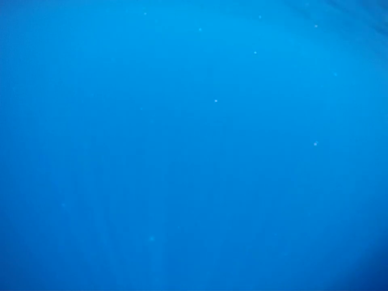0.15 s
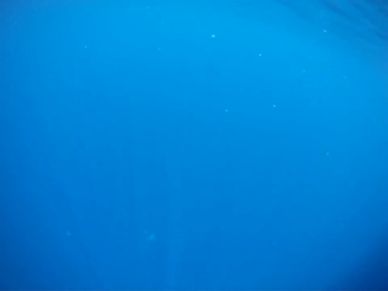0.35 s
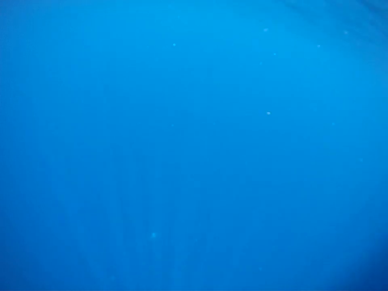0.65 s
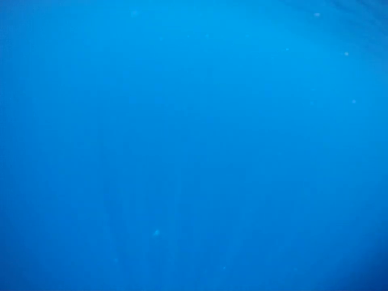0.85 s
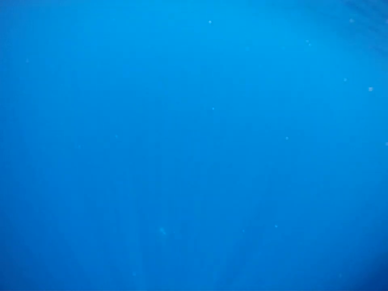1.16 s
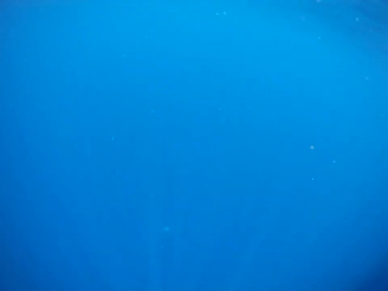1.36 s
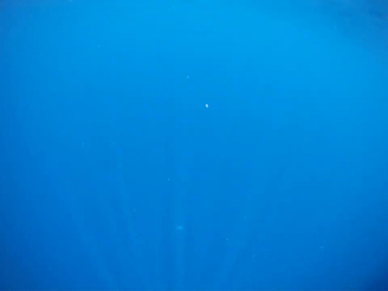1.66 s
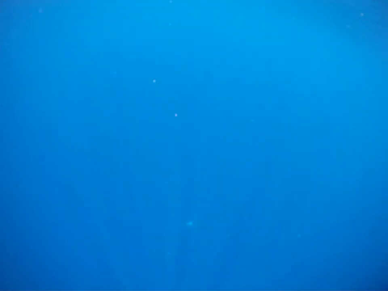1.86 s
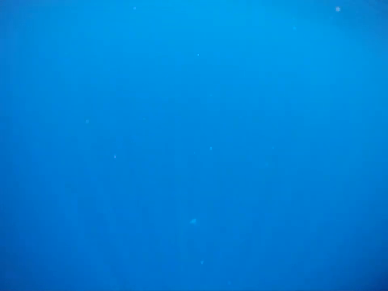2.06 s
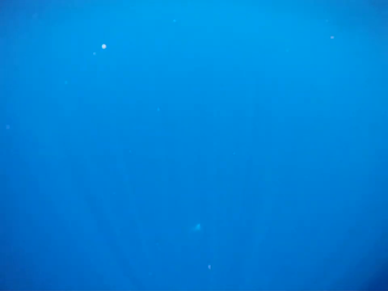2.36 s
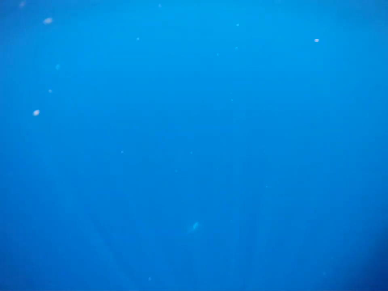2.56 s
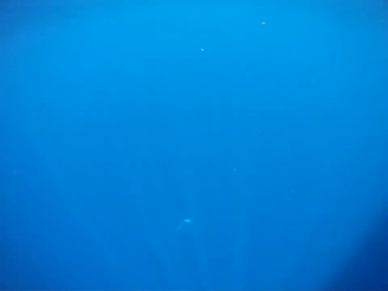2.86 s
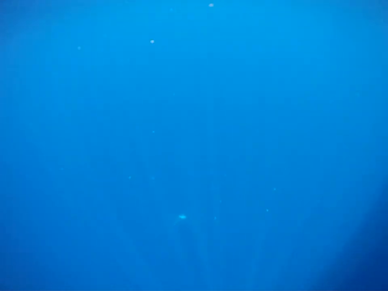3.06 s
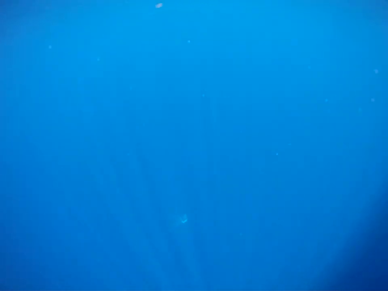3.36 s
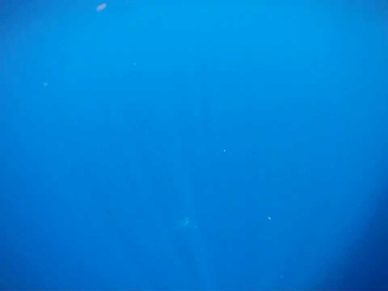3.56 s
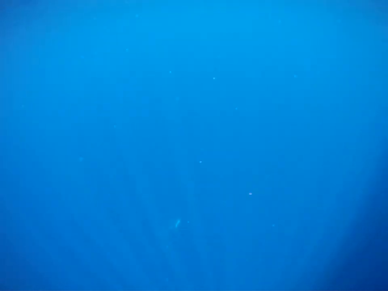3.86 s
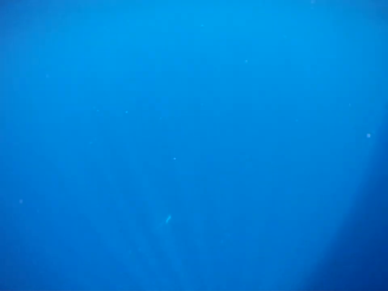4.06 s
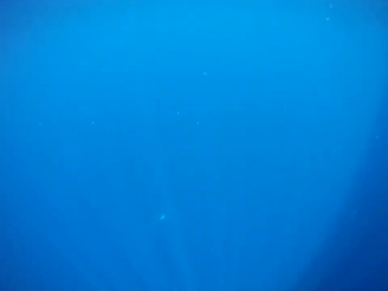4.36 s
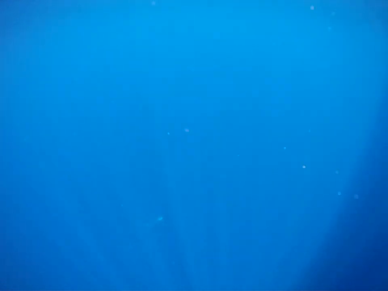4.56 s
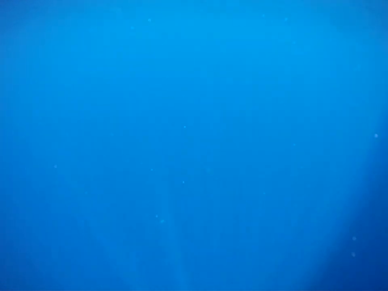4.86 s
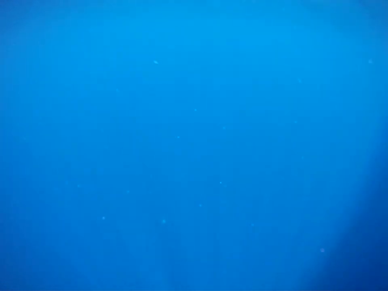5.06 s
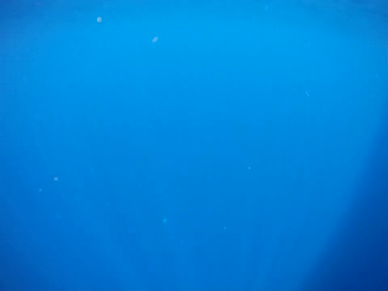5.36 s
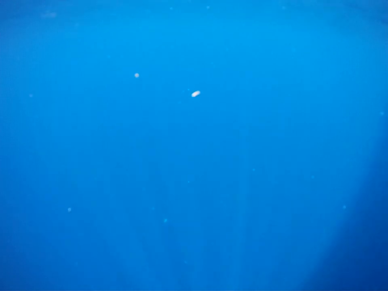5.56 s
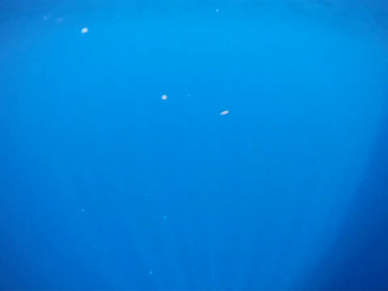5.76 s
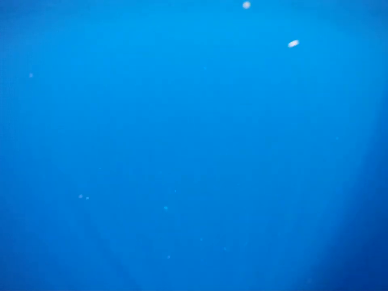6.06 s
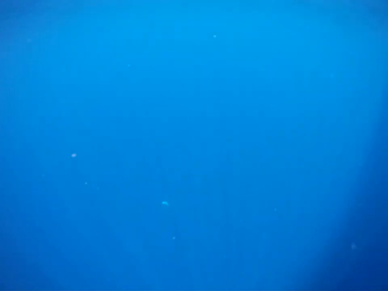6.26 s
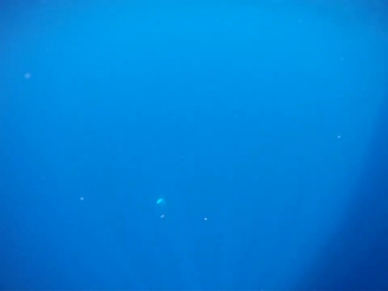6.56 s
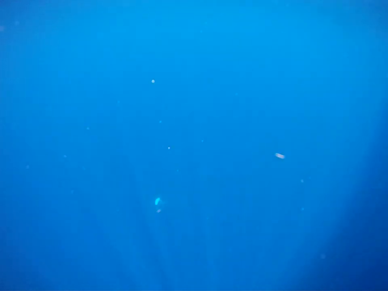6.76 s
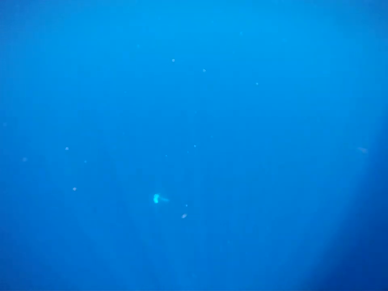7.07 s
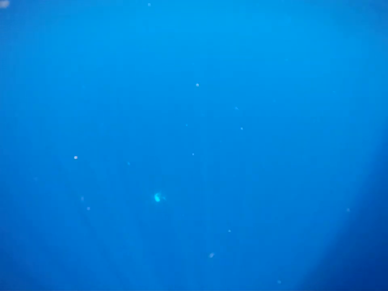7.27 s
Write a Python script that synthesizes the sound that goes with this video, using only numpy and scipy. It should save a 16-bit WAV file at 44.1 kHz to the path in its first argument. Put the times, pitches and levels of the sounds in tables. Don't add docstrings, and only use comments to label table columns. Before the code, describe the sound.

Close, boxed-in microphone under water, slowed down and slightly gritty with mirrored high frequencies. A motor drones low and unsteady beneath muffled propeller bubbles. A very loud overloaded knock hits at two seconds, then hollow taps and four weaker knocks until four seconds, the motor dropping away after each. Afterwards low wobbling rumbles, a rising then easing motor pitch, sharp little ticks and a short bubble gust.

```python
import sys
import numpy as np
from scipy import signal
from scipy.io import wavfile
from scipy.ndimage import uniform_filter1d

SR = 44100
rng = np.random.default_rng(int(sys.argv[2]) if len(sys.argv) > 2 else 0)


def undo_db(level):
    steps = np.asarray(level, float) / 20
    return 10 ** steps


def materialize(psi):
    bounded = np.clip(np.atleast_2d(psi).T, -1, 1)
    quanta = np.round(bounded * 32767).astype(np.int16)
    wavfile.write(sys.argv[1], SR, quanta)


N = 327663
HOLD_HZ = 12000


def evened(x):
    return x / np.sqrt(np.mean(x ** 2) + 1e-20)


def columns(table):
    curve_s, *values = np.transpose(table)
    return [np.interp(np.arange(N) / SR, curve_s, value) for value in values]


def add(mix, start_s, sound):
    part = mix[round(start_s * SR):][:len(sound)]
    part += sound[:len(part)]


def ring(modes, pitch_factor, rise_s):
    t = np.arange(SR // 2) / SR
    body = 0
    for pitch_hz, level_db, t60_s in modes:
        body = body + undo_db(level_db - 60 * t / t60_s) * np.sin(2 * np.pi * pitch_hz * pitch_factor * t)
    return body * (1 - np.exp(-t / rise_s))


def fuzzy(pitch_hz, width_hz, steady):
    pole = np.exp(-np.pi * width_hz / SR)
    noise = rng.standard_normal((N + SR, 2)) @ [1, 1j]
    drift = signal.lfilter([1], np.convolve([1, -pole], [1, -pole]), noise)[SR:]
    drift = drift / abs(drift) ** np.clip(steady, 0, 1)
    phase = 2 * np.pi * np.cumsum(pitch_hz * np.ones(N)) / SR
    return evened((drift * np.exp(1j * phase)).real)


# start_s [s], level_db [dB]
WASH = [(0, -36), (.7, -37.5), (1.9, -35.5), (2.75, -36), (4.3, -38.5), (5.3, -38.5), (6.2, -39.5),
        (7.05, -38), (7.43, -37.5)]
# pitch_hz [Hz], density_db [dB per Hz]
WASH_SLOPE = [(120, -5), (300, -16), (600, -6), (900, -17), (2400, -22), (2650, -34.5), (3200, -38),
              (4500, -44), (6000, -52)]
# pitch_hz [Hz], width_hz [Hz], level_db [dB]
HOUSING = [(351, 35.5, 8.5), (524, 49.6, 9), (679.3, 26, 8), (925, 47, -12.5), (1090, 17, 6.5),
           (1105.3, 65, -37.5), (1148, 174, 12.5), (1520, 52, -11.5), (1625, 70, 2), (1840, 77, -10.5),
           (1950, 204, 2.5), (2332, 107, 8), (2820, 230, 7), (3390, 110, 4.5), (3690, 100, 4.5),
           (4020, 120, 2)]


def wash():
    frames, hz = N // 256 + 5, np.fft.rfftfreq(1024, 1 / SR)
    real, imag, patches = rng.standard_normal((frames, 513, 3)).T
    patches = evened(uniform_filter1d(uniform_filter1d(patches, 10, 0), 8, 1))
    flicker = rng.standard_normal(frames)
    slope_hz, slope_db = np.transpose(WASH_SLOPE)
    colour_db = np.interp(np.log(hz + 1), np.log(slope_hz), slope_db) - 60 * (hz > HOLD_HZ / 2)
    for pitch_hz, width_hz, level_db in HOUSING:
        colour_db += level_db * np.exp(-((hz - pitch_hz) / width_hz) ** 2)
    spectrum = (real + 1j * imag) * undo_db(colour_db[:, None] + 0.76 * patches + 1.37 * flicker)
    noise = evened(signal.istft(spectrum, nperseg=1024, noverlap=768)[1][:N])
    throb = 1 + 0.1 * np.cos(2 * np.pi * np.cumsum(columns(MOTOR)[0]) / SR)
    gust_s, gust_db, gust_length_s = 7.19, 3.5, 0.062
    puff_db = gust_db * np.exp(-((np.arange(N) / SR - gust_s) / gust_length_s) ** 2)
    return undo_db(columns(WASH)[0] + puff_db) * throb * noise


def pump():
    return undo_db(-67) * fuzzy(273, 4.2, steady=0.54)


# start_s [s], firing_hz [Hz], hum_db [dB], load [0-1.1]
MOTOR = [(0, 65.14, -49.5, 0), (.5, 68.3, -45.5, 0.26), (1.03, 66.8, -46.5, .1), (1.15, 65.2, -59, .3),
         (1.36, 70.46, -45, 0.27), (1.55, 72.04, -46.5, 0.63), (1.78, 68, -44.5, 0.45),
         (2.0, 61.9, -47, 0.3), (2.45, 60.83, -47.5, 0.6), (3.8, 65.73, -48.5, .5), (4.5, 67, -56, 0.71),
         (4.7, 67.16, -45, 0.86), (5.1, 68.2, -48.5, 0.74), (5.85, 75.1, -50.5, 0.41), (6.2, 80.9, -47, .3),
         (6.55, 85.5, -50.5, 1.1), (6.85, 76.6, -45, 0.78), (7.15, 73, -51, .75)]
# multiple of firing_hz, level_db [dB]
UPPER_ORDERS = [(4, -60.5), (5, -57.5)]


def motor():
    firing_hz, hum_db, load = columns(MOTOR)
    load_tilt_db = 24
    tilt_db = load_tilt_db * (load - 0.5)
    second_db = hum_db + tilt_db
    third_db = hum_db - abs(tilt_db) / 2 - tilt_db / 2
    orders = [(2, second_db), (3, third_db), *UPPER_ORDERS]
    return sum(undo_db(level_db) * fuzzy(k * firing_hz, 2.6, steady=0.61) for k, level_db in orders)


def bump(start_s, length_s):
    t = np.arange(0, N + 64, 64) / SR
    return undo_db(-np.minimum(24 * ((t - start_s) / length_s) ** 2, 120))


def shared(pushes):
    power = 0
    for start_s, level_db, length_s, lean_db in pushes:
        pair = undo_db([[level_db - lean_db / 2], [level_db + lean_db / 2]])
        power = power + (pair * bump(start_s, length_s)) ** 2
    return power


# pitch_hz [Hz], width_hz [Hz]
SLOW_MODES = [(25, 9.7), (44, 9.8), (81, 11), (106, 18)]
CALM_DB = [-49.5, -47, -51.5, -52.5]
# centre_s [s], level_db [dB], length_s [s], lean_to_rocking_db [dB]
SURGES = [(.13, -39.5, .15, 2), (.27, -42, 0.19, -7), (.58, -45, .2, 0), (1.09, -35, 0.16, 4),
          (1.18, -37.5, 0.13, -2), (1.6, -35.5, 0.15, 6), (1.8, -38.5, .18, 0), (1.99, -29, 0.074, 11),
          (2.2, -34, 0.5, 3), (2.48, -20.5, .11, 1.5), (2.75, -26.5, 0.21, 8), (2.84, -32, 0.14, -2),
          (3.04, -31, 0.33, 1), (3.3, -30.5, 0.33, -2), (3.76, -32.5, 0.18, 11.5), (4.06, -33.5, .15, 8),
          (4.17, -28, 0.082, 2), (4.42, -40, .25, -3), (4.97, -38.5, 0.27, 0), (5.24, -38.5, 0.18, 6),
          (5.76, -38, 0.14, -4), (6.45, -43, .22, -6), (6.66, -32, .1, 8), (6.93, -39, 0.13, 0),
          (7.23, -39.5, .2, -4)]
# centre_s [s], level_db [dB], length_s [s], lean_to_front_db [dB]
FLEXES = [(.66, -51, .2, -10), (.96, -38, 0.061, -4), (1.08, -36.5, .09, -5), (1.36, -48, 0.16, 3),
          (1.75, -37, 0.11, -0.5), (1.98, -37, .1, 5), (2.33, -34, 0.052, -3), (2.5, -37, .22, -2),
          (2.74, -31, 0.13, -8.5), (2.88, -33, 0.1, -11), (3.0, -38.5, .08, -3), (3.22, -31, 0.12, 1),
          (3.4, -29.5, 0.071, 17.5), (3.69, -35, 0.13, -7), (3.78, -34.5, 0.077, 7),
          (4.05, -37.5, 0.092, -14), (4.27, -36.5, 0.23, 12.5), (4.48, -38.5, .2, 10.5),
          (4.63, -34.5, 0.16, 4), (5.04, -31.5, .12, 4.5), (5.22, -36.5, 0.23, 7.5), (5.5, -36, 0.22, 1.5),
          (5.64, -32.5, .07, 2), (5.77, -29, 0.093, -3), (5.95, -41.5, 0.27, 3), (6.42, -32, .2, 2.5),
          (6.67, -36, .1, -10), (6.75, -32.5, .13, 9), (7.0, -34, .3, 3.5), (7.25, -36.5, .25, 4.5)]


def shove():
    calm_power = undo_db(np.array(CALM_DB))[:, None] ** 2
    power = calm_power + np.vstack([shared(SURGES), shared(FLEXES)])
    levels = [np.interp(np.arange(N) / 64, np.arange(len(p)), np.sqrt(p)) for p in power]
    rustle = undo_db(-15.5) * levels[-1] * fuzzy(145, 70, steady=0.23)
    walls = 0
    for level, (pitch_hz, width_hz) in zip(levels, SLOW_MODES):
        walls = walls + level * fuzzy(pitch_hz, width_hz, steady=0.47)
    return walls + rustle


# start_s [s], level_db [dB], pitch_hz [Hz]
NUDGES = [
    (2.37, -29, 182),
    (3.298, -26.5, 185.5),
    (3.74, -24, 173),
    (7.139, -30, 335.5),
]


def nudges():
    out = np.zeros(N)
    for start_s, level_db, pitch_hz in NUDGES:
        add(out, start_s, ring([(pitch_hz, level_db, 0.2)], 0.93, rise_s=0.017))
    return out


# start_s [s], level_db [dB], pitch_hz [Hz]
TICKS = [
    (1.203, -46, 5700),
    (2.128, -52, 2300),
    (2.791, -17.5, 2650),
    (2.798, -31, 2500),
    (7.167, -25, 2400),
    (7.1675, -21.5, 3120),
    (7.169, -44, 4600),
]


def ticks():
    out = np.zeros(N)
    for start_s, level_db, pitch_hz in TICKS:
        add(out, start_s, ring([(pitch_hz, level_db, 0.006)], 0.96, rise_s=0.00065))
    return out


# start_s [s], ring_db [dB], late_flex_db [dB], pitch_factor, gain_drop_db [dB]
TAPS = [
    (2.788, -13, -2, 0.95, 6.5),
    (2.8628, -10.5, -37, 0.95, 4.5),
]
# pitch_hz [Hz], level_db [dB], t60_s [s]
HOLLOW = [(285.6, -10, 0.065), (366, 5, 0.029), (539, 5, 0.041), (607, 8, 0.018), (698, -14, 0.1),
          (840, -2.5, 0.089), (1230, -18, 0.024)]


def taps():
    out, t = np.zeros(N), np.arange(SR // 2) / SR
    damped_db = -np.clip(1500 * (t - 0.021), 0, 14)
    for start_s, ring_db, flex_db, pitch_factor, _ in TAPS:
        add(out, start_s, -undo_db(ring_db + damped_db) * ring(HOLLOW, pitch_factor, rise_s=0.0018))
        flex = ring([(84.4, 0.0047, 0.096)], 1.0, rise_s=0.0045)
        add(out, start_s + 0.0154, undo_db(flex_db) * flex)
    return out


KNOCK_S = [2.0401, 2.9318, 3.1454, 3.6076, 3.9667]
# crack_db [dB], thump_db [dB], thump_lag_ms [ms], gain_drop_db [dB], overload_db [dB]
KNOCKS = [
    (14.5, 8, 3.87, 26, 9),
    (6, 1.5, 2, 22, 1),
    (-0.5, 1.5, 3.9, 18, 1.5),
    (-7.5, -0.5, 3.8, 13.5, 2),
    (-5.5, 0.5, 3.7, 16, 0.5),
]
# pitch_hz [Hz], level_db [dB], t60_s [s]
CRACK = [(608, 6, 0.016), (1421, 0.5, 0.0092), (1724, 3.5, 0.0063), (2500, -13.5, 0.012)]
# pitch_hz [Hz], level_db [dB], t60_s [s]
THUMP = [(147.2, 0.5, 0.043), (109.6, -3.5, 0.1), (40, -25, 0.35)]


def knocks():
    out, t = np.zeros(N), np.arange(SR // 2) / SR
    swell = 1 - np.exp(-t / 0.0017)
    for start_s, (crack_db, thump_db, lag_ms, _, overload_db) in zip(KNOCK_S, KNOCKS):
        lag_s = lag_ms / 1000
        choke = undo_db(-1200 * overload_db * np.maximum(t - lag_s, 0))
        add(out, start_s, -undo_db(crack_db) * choke * swell * ring(CRACK, 0.89, rise_s=0.0018))
        flat = np.minimum(undo_db(overload_db) * ring(THUMP, 0.95, rise_s=0.0017), 1)
        sag_db = 5.0 * overload_db * (1 - np.exp(-t / 0.012))
        add(out, start_s + lag_s, undo_db(thump_db - sag_db) * flat)
    return out


def gain_drop_db():
    t = np.arange(N) / SR
    trips = [(start_s + 0.006, row[3]) for start_s, row in zip(KNOCK_S, KNOCKS)]
    trips += [(row[0] + 0.027, row[4]) for row in TAPS]
    drops_db = [(drop_db - 85 * (t - trip_s)) * (t > trip_s) for trip_s, drop_db in trips]
    return np.maximum(np.max(drops_db, 0), 0)


def uneven_gain():
    drop_db = gain_drop_db()
    falling = np.clip(np.convolve(np.diff(drop_db, prepend=0) > 3, np.ones(330))[:N], 0, 1)
    steps_db = 0.21 * np.repeat(rng.standard_normal((N // 5 + 1, 2)), 5, axis=0)[:N].T
    left_db = -1.6 * uniform_filter1d(np.tanh(drop_db / 9), size=20)
    return undo_db(np.array([left_db, 0 * left_db]) + falling * steps_db)


def slowed(x):
    slow = signal.resample_poly(x, up=40, down=147, axis=1, padtype="line")
    return signal.resample_poly(np.repeat(slow, 4, axis=1), up=147, down=160, axis=1, padtype="line")


def scene():
    far = wash() + motor() + pump() + undo_db(-73.5) * rng.standard_normal(N)
    ducked = undo_db(-uniform_filter1d(gain_drop_db(), size=200))
    near = shove() + nudges() + ticks() + taps() + knocks()
    mono = far * ducked + near
    mono *= np.minimum((N - np.arange(N)) / 60, 1)
    return np.array([mono, mono])


def top_cut(x):
    return signal.sosfilt(signal.butter(12, 16340, fs=SR, output="sos"), x)


def record(dry):
    full = np.clip(dry, -1.15, 1.15) * uneven_gain()
    drooped = signal.lfilter(*signal.butter(1, 9.0, "high", fs=SR), full)
    hissy = drooped + undo_db(-69.0) * rng.standard_normal(dry.shape)
    held = np.pad(slowed(hissy), ((0, 0), (127, 135)), mode="reflect")[:, :N + 254]
    edge = signal.firwin(255, 15100, fs=SR)
    limited = signal.oaconvolve(held, edge[None], "valid")
    return top_cut(np.clip(limited, -1, 1))


dry = scene()
out = record(dry)
materialize(out)
```